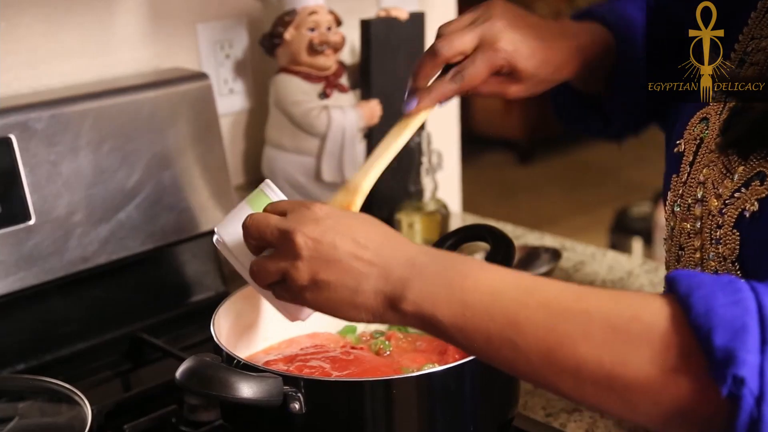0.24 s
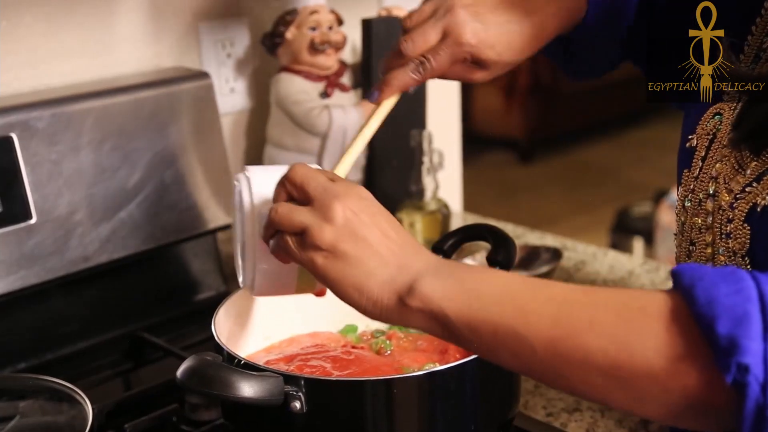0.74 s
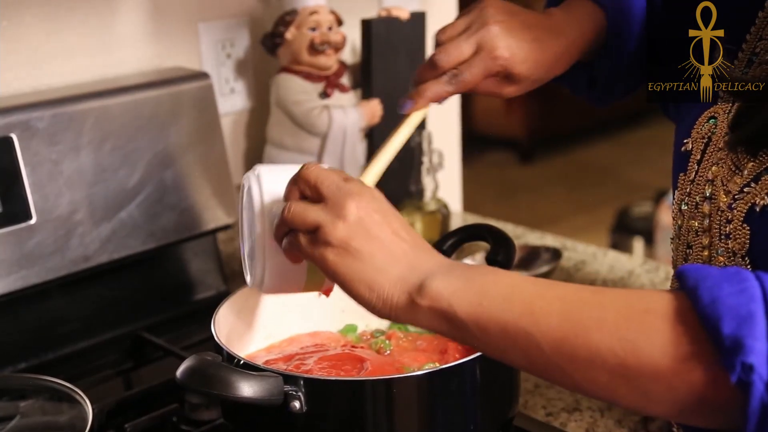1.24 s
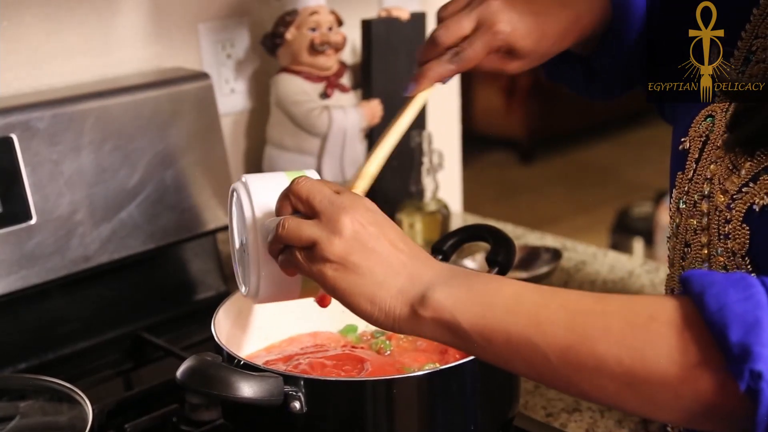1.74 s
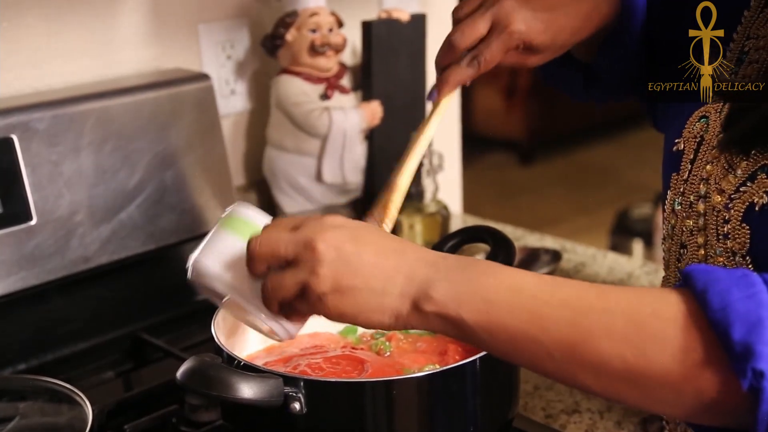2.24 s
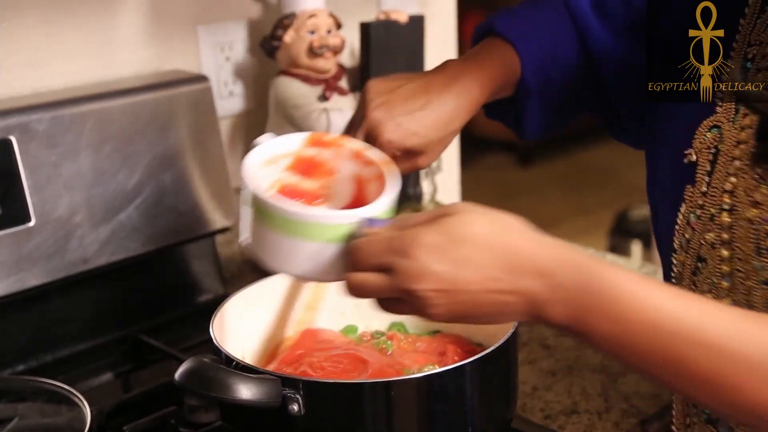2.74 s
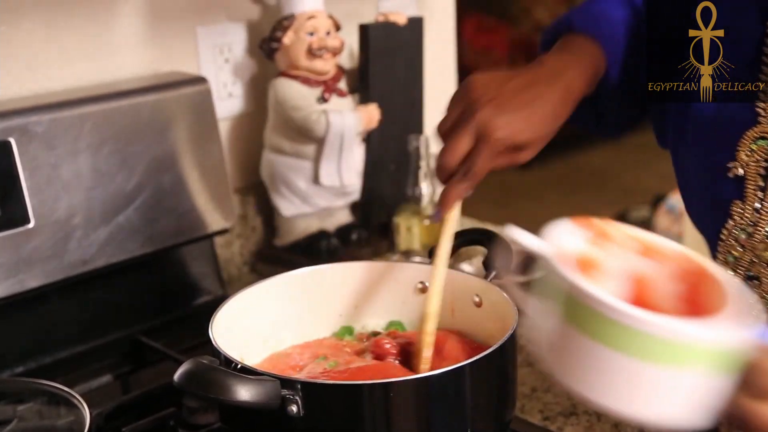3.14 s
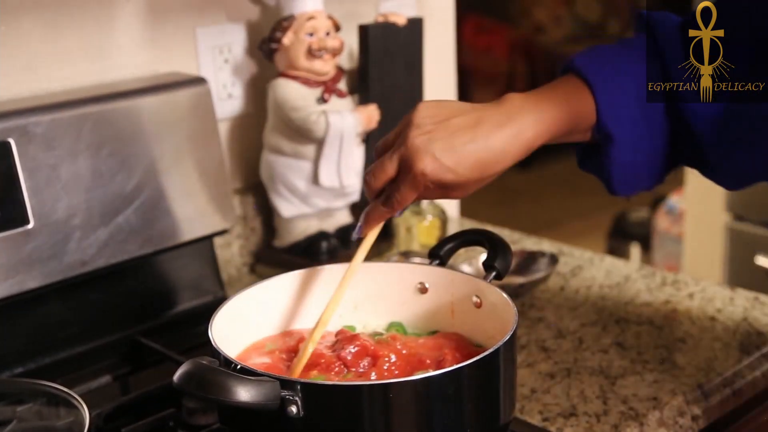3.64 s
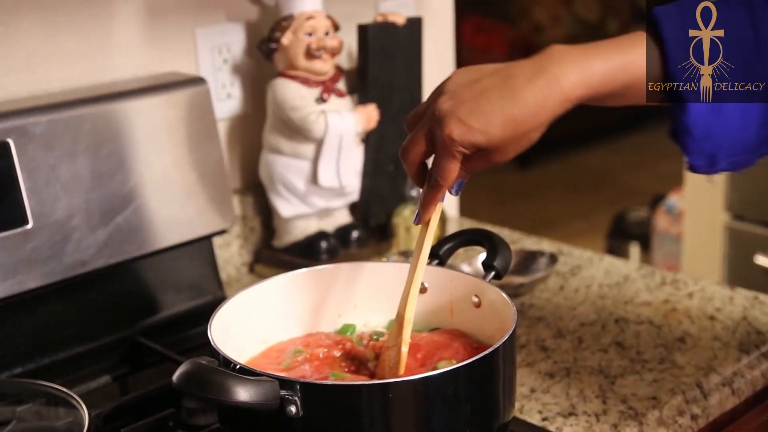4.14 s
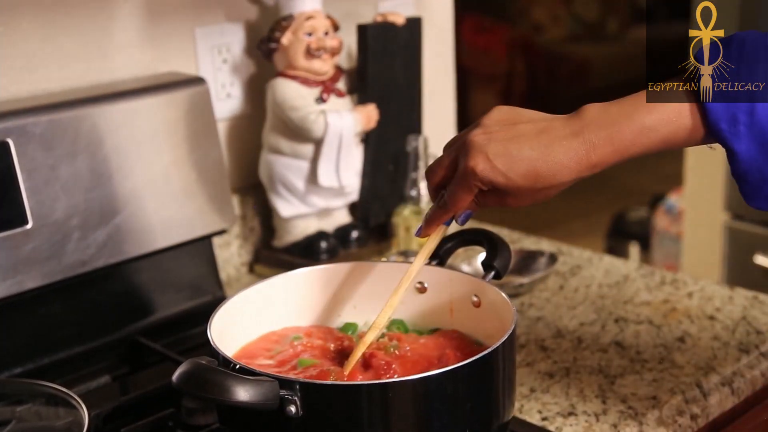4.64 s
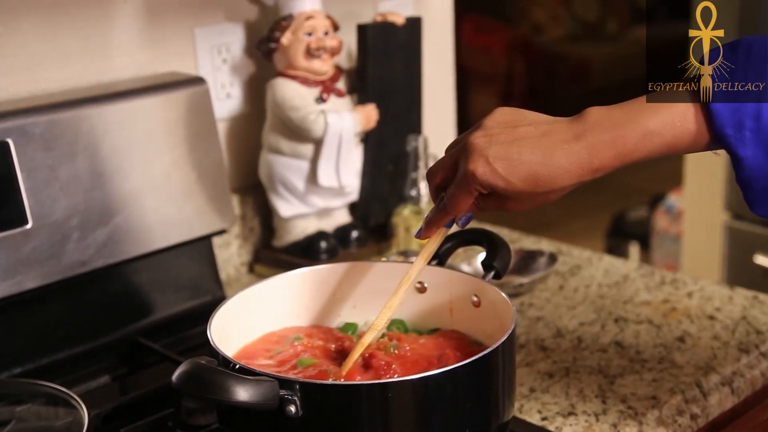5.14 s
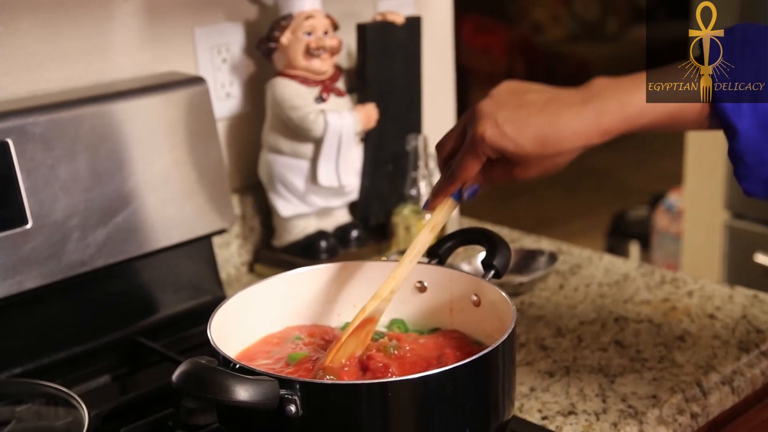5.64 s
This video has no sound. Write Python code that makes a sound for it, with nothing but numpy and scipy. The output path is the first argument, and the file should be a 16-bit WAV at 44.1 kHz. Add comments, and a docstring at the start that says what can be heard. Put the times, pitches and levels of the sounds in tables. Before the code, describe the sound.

In a small kitchen, closely miked, hot oil crackles finely while a wooden spoon clacks and taps a hand-held plastic tub, with three loud hollow tocks. The tub is lifted away with a dull bump, the frying sinks under sauce, soft thuds and squelches follow, then the spoon hits the bare enamel pot wall, which rings, with scraping and a quick second cluster of knocks.

```python
"""Dry wooden clacks and a fine crackle of hot oil come first, then short hollow tocks: a wooden spoon knocks
tomato sauce out of a plastic tub into a hot enamel pot, then stirs it. Tub, shaft and pot are struck bodies,
built from decaying modes and contact noise; the pot thuds under the sauce and rings when its bare wall is hit.
Oil is random pops over fizz until the sauce covers it; sauce and scrapes are shaped noise and stick-slip.
A small kitchen adds echoes and a decaying tail; a close microphone has gain control."""
import sys
import numpy as np
from scipy import signal
from scipy.fft import rfft, irfft
from scipy.io import wavfile

SR = 44100
rng = np.random.default_rng(int(sys.argv[2]) if len(sys.argv) > 2 else 0)


def wav_out(sig):
    """Save sig, one row per channel (or a flat mono array), as 16-bit PCM at SR to the path in sys.argv[1]."""
    wavfile.write(sys.argv[1], SR, np.round(np.clip(np.atleast_2d(sig).T, -1, 1) * 32767).astype(np.int16))


N = 260315
TIME = np.arange(N) / SR   # s, through the scene
AGE = np.arange(SR * 3 // 5) / SR   # s, since a single blow or burst

# Spoon on the hand-held tub: t/s, level/dB, wall f/Hz, swell time/s, base level/dB, rim level/dB
TUB_TAPS = [(0.062, -14.5, 1920, 0.00074, -1, -16), (0.3279, -19.5, 1750, 0.00078, -24, -3.5),
            (0.33, -19, 2260, 0.0012, -2.5, -15), (0.4082, -16, 2277, 0.0017, 8.5, -8),
            (0.6550, -21.5, 1600, 0.0006, -3, -30), (1.0965, -4.5, 1845, 0.0013, -23, -9),
            (1.1006, -14, 2150, 0.0015, -19, -23), (1.2, 5.5, 1792, 0.0012, -33, -14),
            (1.5283, 1.5, 1776, 0.0011, -11, -9), (1.847, -40.5, 1780, 0.0018, 3, 1),
            (2.0556, -7.5, 1805, 0.0014, -6, -14), (2.831, -32, 1510, 0.001, -0.5, -13)]
# Modes of the tub's base, then of its rim: f/Hz, level/dB, t60/s
TUB_BASE = [(517.5, -17.5, 0.019), (800, -11.5, 0.0095), (914, -12, 0.022), (1043, -8, 0.031),
            (1400, -5, 0.0041)]
TUB_RIM = [(2280, -10.5, .018), (3096, -1, 0.0055), (3655, -8, 0.0046), (3950, -18, 0.018),
           (5930, -14.5, .008), (6876, -19, 0.003)]
# Dry clacks of the spoon's shaft: t/s, level/dB, lowest f/Hz that the contact excites
CLACKS = [(0.0005, -20, 1500), (0.0056, -19.5, 1400), (0.042, -29.5, 1790), (0.0640, -21, 710),
          (1.0981, -21.5, 2500), (2.6286, -14, 240), (2.8285, -34, 600), (4.998, -22, 2000),
          (5.0167, -18, 2000), (5.304, -40, 2216)]
# Modes of the wooden shaft: f/Hz, level/dB, t60/s
SHAFT_MODES = [(347.5, -18, 0.029), (520, -20.5, 0.021), (725, -17.5, 0.076), (1408, -4, 0.014),
               (1606, -3.5, 0.015), (1780, -13, 0.033), (2113, -7.5, 0.043), (2457, -15, 0.11),
               (2796, -9.5, 0.028), (3998, -7.5, 0.018), (4500, -21.5, 0.019), (5110, -10.5, 0.013),
               (6345, -21.5, 0.011), (7930, -45.5, .012)]
# Soft knocks on the pot's bottom through the sauce: t/s, level/dB
THUDS = [(0.4120, -34), (3.1542, -26.5), (3.6225, -26.5), (3.6370, -29.5), (4.0655, -29.5)]
# Damped modes of the pot's bottom: f/Hz, level/dB, t60/s
BOTTOM_MODES = [(248, -16, 0.027), (362, -8.5, 0.033), (493, -10.5, 0.061), (538, -7, 0.046),
                (689, -2.5, 0.042), (1010, -11, 0.0154), (1115, -10.5, 0.025), (1465, -13, 0.064),
                (1750, -29, 0.018)]
# Soft noise bursts, decaying tails of early tub taps, then sauce sucking at the spoon:
# t/s, level/dB, centre f/Hz, t60/s
SOFT_BURSTS = [(0.333, -36.5, 1800, 0.23), (0.359, -42, 350, 0.07), (0.4130, -28, 1400, 0.073),
               (2.742, -42, 1400, 0.3), (2.9230, -44.5, 1290, 0.15), (3.6980, -43, 4260, 0.048),
               (3.877, -44.5, 320, 0.041)]
# Spoon on the bare pot wall: t/s, level/dB, ring level/dB, overtone level/dB
POT_HITS = [(4.6145, -1.5, -1.5, -7.5), (4.6629, -16, 8.5, -10.5), (4.6825, -20, -2, -15),
            (4.9344, -30.5, -14, -11), (4.9472, -37, -4, -6), (4.97, -26, 0, -18), (4.9808, -14, 0, -11),
            (4.9999, -11, 9.5, 2), (5.0170, -16.5, -4, 11.5)]
# Modes of the pot wall, low ones, overtones and short-lived knock: f/Hz, level/dB, t60/s
POT_RING = [(397, -35, 0.62), (1076, -26.5, 0.31), (1999, -4, 0.29), (2030, -22, 0.19), (2395, -22.5, 0.11),
            (2560, -34.5, .22)]
POT_OVERTONES = [(3020, -28, 0.073), (4060, -29.5, 0.34), (4547, -26.5, 0.16), (5280, -38.5, 0.3),
                 (7200, -46, 0.28), (8789, -34, 0.16), (8970, -47, 0.39), (11540, -57, .15),
                 (12760, -58, .2), (15000, -48, 0.13)]
POT_KNOCK = [(844, -23, 0.011), (1067, -9.5, 0.023), (1350, -2.5, 0.0078), (1600, -2, 0.014),
             (1830, -7, 0.014), (2490, -20.5, 0.0093)]
# Spectrum of the shudder of pot and stove grate: f/Hz, level/dB per Hz
SHUDDER = [(150, -39.5), (300, -14.5), (420, -13.5), (700, -4.5), (1080, -3.5), (1350, -12), (1750, -6),
           (2400, -4.5), (3100, -16), (5000, -23), (6500, -49), (15000, -56)]
# Spoon resting on the ringing wall: t/s, length/s, damping/(dB/s)
RESTS = [(4.715, 0.22, 105), (5.003, 0.12, 332)]
# Spoon scraping along the pot, pressed ever harder, then let go: t of greatest force/s, level/dB, swell/(dB/s)
SCRAPES = [(4.692, -24.5, 250), (4.885, -42.5, 88), (5.013, -26.5, 209)]
# Spits of oil at set times: t/s, peak level/dB
SPITS = [(0.36, -30), (0.985, -29), (1.3145, -31), (1.723, -26.5), (1.738, -29), (2.798, -28.5)]
# Spectrum of the fine frying fizz: f/Hz, level/dB per Hz
FIZZ = [(150, -8.5), (350, -2), (650, 1.5), (1100, -2.5), (1500, 6), (2200, -3), (3500, -6), (6000, -6),
        (8000, -14.5), (11000, -13.5), (16000, -30)]
# Echoes from nearby hard surfaces: delay/s, level/dB
ECHOES = [(.0092, 0.5), (.0195, -7.5), (.0292, -9), (.0480, -12)]
# Decay time of the kitchen: f/Hz, t60/s
KITCHEN_T60 = [(150, 0.28), (500, 0.67), (1500, 0.45), (2500, 0.16), (5000, .25), (14000, 0.1)]
# Spectrum of room tone: f/Hz, level/dB per Hz
AIR = [(15, -43.5), (25, -17), (114, -4), (363, -8), (476, -8), (734, -9), (1040, -8.5), (1230, -7.5),
       (2050, -9.5), (2280, -10), (2550, -10.5), (3520, -13.5), (5570, -16), (16000, -18)]
# Spectrum of a faint steady noise that widens the stereo image: f/Hz, level/dB per Hz
STEREO_WIDTH = [(25, -7.5), (120, 6.5), (500, 5.5), (1500, -3), (4000, 2.5), (16000, 4.5)]

# Stirred-in sauce smothers the frying, which picks up again as the sauce heats
SMOTHER_S, SMOTHER_DB_PER_S, SMOTHERED_DB = 3.2, 9.5, -16
REHEAT_S, REHEAT_DB_PER_S = 5.46, 21
# Stirring adds small squelches at random, from the moment the sauce is mixed in
STIR_LENGTH_S, STIR_SQUELCHES_PER_S, STIR_DB, STIR_T60_S = 1.0, 12, -50, 0.09
STIR_LOW_HZ, STIR_HIGH_HZ = 280, 1500
SCRAPE_RELEASE_DB_PER_S = 241.5
# Faint squeak of wet wood on enamel, growing until the spoon strikes the wall
SQUEAK_S, SQUEAK_HZ, SQUEAK_SAG_HZ_PER_S = 4.3, 1105, 390
SQUEAK_DB, SQUEAK_SWELL_DB_PER_S, SQUEAK_FADE_S = -68, 31.5, 0.02
# Frying: pop rate between flurries and lulls, then starting levels
POPS_PER_S, POP_DB, FIZZ_DB = 900, -58.5, -53.5
# Further spits come at random while the oil is bare, within SPIT_DB plus or minus SPIT_RANGE_DB
SPITS_PER_S, SPIT_DB, SPIT_RANGE_DB, SPIT_HZ = 5, -33.5, 6, 7500
BUMP_S = 2.849   # the tub is lifted away
CUTOFF_HZ = 15900   # upper limit of the microphone chain


def amp(db):
    """Logarithmic level: decibels to linear gain."""
    return 10 ** (np.asarray(db) / 20)


def rms_one(x):
    """Normalisation to unit root-mean-square."""
    return x / np.sqrt(np.mean(x ** 2) + 1e-20)


def at_hz(points, hz):
    """Linear interpolation of a table along log frequency."""
    f, value = np.transpose(points)
    return np.interp(np.log(np.maximum(hz, 1)), np.log(f), value)


def band(x, low_hz, high_hz):
    """Causal band-pass filtering."""
    edges = [low_hz, min(high_hz, SR * .48)]
    return signal.sosfilt(signal.butter(2, edges, "band", fs=SR, output="sos"), x)


def noise(spectrum, size):
    """Spectral shaping: white noise weighted by frequency, at unit rms."""
    gain = amp(at_hz(spectrum, np.fft.rfftfreq(size, 1 / SR)))
    return rms_one(irfft(rfft(rng.standard_normal(size)) * gain, size))


def fade(t60):
    """Exponential decay: a free vibration falls 60 dB in t60 seconds."""
    return np.exp(-np.log(1000) * AGE / t60)


def swelling(rise_s):
    """Critically damped envelope: unit peak at rise_s, then decay."""
    return AGE / rise_s * np.exp(1 - AGE / rise_s)


def struck(modes, vary_db=3.5):
    """Modal superposition: damped sines of alternating sign, weighted anew by each blow."""
    out = np.zeros(len(AGE))
    for k, (hz, db, t60) in enumerate(modes):
        gain = (-1) ** k * amp(db + vary_db * rng.normal())
        out += gain * fade(t60) * np.sin(2 * np.pi * hz * AGE)
    return out


def crack(low_hz, high_hz, t60):
    """Contact noise: a brief broadband burst as two surfaces meet."""
    return band(rng.standard_normal(len(AGE)) * fade(t60), low_hz, high_hz)


def add(track, s, sound):
    """Linear superposition of a sound at time s."""
    start = max(round(s * SR), 0)
    track[start:start + len(sound)] += sound[:N - start]


def tub(crack_db=-11, rattle_db=-25, rattle_t60=0.25, rattle_width=1.35):
    """Heavily damped resonance: the wall swells and dies fast, its pitch set by where the spoon lands."""
    out = np.zeros(N)
    for s, db, hz, swell, base_db, rim_db in TUB_TAPS:
        wall = swelling(swell) * np.sin(2 * np.pi * hz * AGE)
        rim = struck(TUB_RIM, vary_db=2.5)
        rim += amp(crack_db) * crack(low_hz=2500, high_hz=7960, t60=.012)
        rattle = amp(rattle_db) * crack(hz / rattle_width, hz * rattle_width, rattle_t60)
        base = amp(base_db) * struck(TUB_BASE)
        add(out, s, amp(db) * (wall + base + amp(rim_db) * rim + rattle))
    return band(out, low_hz=129.1, high_hz=14800)   # the tocks carry little sound below about 130 Hz


def shaft(crack_db=-7):
    """Modal excitation: hard wood clacks with many short modes above the contact's lowest frequency."""
    out = np.zeros(N)
    for s, db, low_hz in CLACKS:
        clack = struck(SHAFT_MODES, vary_db=2.5)
        clack += amp(crack_db) * crack(low_hz=1101, high_hz=5960, t60=0.05)
        add(out, s, amp(db) * band(clack, low_hz, high_hz=13800))
    return out


def bottom(squelch_db=-3):
    """Viscous damping: sauce shortens the bottom's modes and squelches round the spoon."""
    out = np.zeros(N)
    for s, db in THUDS:
        thud = struck(BOTTOM_MODES, vary_db=0.5)
        squelch = crack(low_hz=300, high_hz=1400, t60=0.24)
        add(out, s, amp(db) * (thud + amp(squelch_db) * squelch))
    return out


def soft_bursts(width=1.41):
    """Decaying band noise: tails of early tub taps, then thick sauce letting go of the spoon in wet bursts."""
    count = round(STIR_SQUELCHES_PER_S * STIR_LENGTH_S)
    stirred = []
    for when, pitch in rng.random((count, 2)):
        hz = STIR_LOW_HZ * (STIR_HIGH_HZ / STIR_LOW_HZ) ** pitch
        stirred.append((SMOTHER_S + STIR_LENGTH_S * when, STIR_DB, hz, STIR_T60_S))
    out = np.zeros(N)
    for s, db, hz, t60 in list(SOFT_BURSTS) + stirred:
        burst = rms_one(band(rng.standard_normal(len(AGE)), hz / width, hz * width))
        add(out, s, amp(db) * burst * fade(t60))
    return out


def pot(shudder_db=-22, shudder_t60=0.28, crack_db=-30):
    """Impact and coupled vibration: each wooden knock shakes the pot on its grate."""
    out = np.zeros(N)
    for s, db, *_ in POT_HITS:
        knock = struck(POT_KNOCK) + amp(crack_db) * crack(low_hz=2500, high_hz=9000, t60=.006)
        shudder = amp(shudder_db) * noise(SHUDDER, len(AGE)) * fade(shudder_t60)
        add(out, s, amp(db) * (knock + shudder))
    return band(out, low_hz=373, high_hz=15000)


def wall_ring(modes, strength_db, damping):
    """Energy balance: each blow tops up the modes' energy; damping in dB/s drains it."""
    blows, contact = np.zeros(N), np.hanning(SR // 700)
    for (s, *_), db in zip(POT_HITS, strength_db):
        # wood stays in contact for over a millisecond
        add(blows, s, amp(db) ** 2 * contact ** 2 / np.sum(contact ** 2))
    drained = amp(-np.cumsum(damping) / SR)
    out = np.zeros(N)
    for hz, db, t60 in modes:
        kept_per_sample = amp(-60 / (t60 * SR)) ** 2
        # dividing first lets a new blow escape the earlier draining
        energy = signal.lfilter([1], [1, -kept_per_sample], blows / drained ** 2 + 1e-30)
        out += amp(db) * np.sqrt(energy) * drained * np.sin(2 * np.pi * hz * TIME)
    return out


def pot_ring():
    """Selective damping: of the bell-like tone, the resting spoon damps only the low modes."""
    _, level_db, ring_db, overtone_db = np.transpose(POT_HITS)
    damping = sum(db_per_s * ((TIME > s) & (TIME < s + length)) for s, length, db_per_s in RESTS)
    low_modes = wall_ring(POT_RING, level_db + ring_db, damping)
    return low_modes + wall_ring(POT_OVERTONES, level_db + overtone_db, np.zeros(N))


def scrape_force():
    """Contact force: once the spoon has met the wall, each scrape swells to its peak and lets go."""
    strokes = []
    for s, db, swell in SCRAPES:
        below_peak_db = np.maximum(swell * (s - TIME), SCRAPE_RELEASE_DB_PER_S * (TIME - s))
        strokes.append(amp(db - below_peak_db))
    return np.max(strokes, axis=0) * (TIME > POT_HITS[0][0])


def drag(slips_per_s=220, shudder_db=-16, spread_db=2.5):
    """Stick-slip friction: the spoon catches on the enamel, each slip a tiny knock."""
    sizes = amp(spread_db * rng.uniform(-1.7, 2, N)) * rng.choice([-1, 1], N)
    slips = (rng.random(N) < slips_per_s / SR) * sizes
    slip = struck(POT_KNOCK) + amp(shudder_db) * noise(SHUDDER, len(AGE)) * fade(0.15)
    rubbing = band(signal.fftconvolve(slips, slip)[:N], low_hz=380, high_hz=1880)
    return scrape_force() * rms_one(rubbing)


def squeak(waver=0.01265):
    """Periodic stick-slip: regular slipping whistles, sinking as the spoon slows; waver is rms fraction."""
    length = POT_HITS[0][0] - SQUEAK_S
    age = np.clip(TIME - SQUEAK_S, 0, length)
    gate = np.minimum(np.minimum(age, length - age) / SQUEAK_FADE_S, 1)
    wander = rms_one(band(rng.standard_normal(N), low_hz=9.2, high_hz=90.4))
    hz = (SQUEAK_HZ - SQUEAK_SAG_HZ_PER_S * age) * (1 + waver * wander)
    level = amp(SQUEAK_DB + SQUEAK_SWELL_DB_PER_S * age)
    return gate * level * np.sin(2 * np.pi * np.cumsum(hz) / SR)


def frying_vigour():
    """Source level in dB: steady in the bare oil, sinking under the sauce, then recovering."""
    smothered = np.clip(-SMOTHER_DB_PER_S * (TIME - SMOTHER_S), SMOTHERED_DB, 0)
    return smothered + REHEAT_DB_PER_S * np.maximum(TIME - REHEAT_S, 0)


def frying(spread_db=5.2, clump_range_db=7, clumps_per_s=70):
    """Random impulse process: droplets burst in the oil in flurries of short pops, over a fine fizz."""
    vigour_db = frying_vigour()
    clumps_db = clump_range_db * rng.uniform(-1, 1, N)
    flurry = amp(np.interp(TIME * clumps_per_s, np.arange(N), clumps_db))
    sizes = amp(spread_db * np.minimum(rng.exponential(1, N), 3.6)) * rng.choice([-1, 1], N)
    pops = (rng.random(N) < POPS_PER_S * flurry / SR) * sizes * np.sqrt(flurry)
    pitches = np.geomspace(3600, 11500, 10)   # Hz
    dealt = rng.integers(0, len(pitches), N)   # each pop gets one pitch
    crackle = np.zeros(N)
    for k, hz in enumerate(pitches):
        crackle += band(pops * (dealt == k) + 1e-18, hz / 1.4, hz * 1.5)
    return amp(POP_DB + vigour_db) * rms_one(crackle), amp(FIZZ_DB + vigour_db) * noise(FIZZ, N)


def spits(t60=0.005, width=2.1, spread_octaves=0.38):
    """Transient radiation: drops of oil burst with a sharp tick of band noise."""
    count = round(SPITS_PER_S * SMOTHER_S)
    further = [(SMOTHER_S * when, SPIT_DB + SPIT_RANGE_DB * (2 * size - 1))
               for when, size in rng.random((count, 2))]
    out = np.zeros(N)
    for s, db in list(SPITS) + further:
        hz = SPIT_HZ * 2 ** (spread_octaves * rng.uniform(-1, 1))
        tick = band(rng.standard_normal(len(AGE)) * (fade(t60) + 1e-18), hz / width, hz * width)
        add(out, s, amp(db) * tick / np.abs(tick).max())
    return out


def bump(db=-46, hz=75, swell=0.0043):
    """Low-frequency transient: a dull bump as the tub is lifted away."""
    out = np.zeros(N)
    body = np.sin(2 * np.pi * hz * AGE) + 6 * crack(low_hz=81, high_hz=320, t60=.2)
    add(out, BUMP_S, amp(db) * swelling(swell) * body)
    return out


def kitchen(x, early_db=-6, early_t60=.13, gap=0.0064):
    """Reverberation: stove back and counter echo, and the room dies away band by band after a gap in s."""
    edges = np.geomspace(100, 16000, 9)   # Hz
    tail = np.zeros(len(AGE))
    for low, high in zip(edges, edges[1:]):
        decay = fade(at_hz(KITCHEN_T60, np.sqrt(low * high))) + amp(early_db) * fade(early_t60)
        tail += band(rng.standard_normal(len(AGE)), low, high) * decay
    tail *= AGE > gap
    tail /= np.sqrt(np.sum(tail ** 2))
    for delay, db in ECHOES:
        tail[round(delay * SR)] += amp(db)
    return signal.fftconvolve(x, tail)[:N]


def air(db=-56, width_db=-62):
    """Stationary noise: common room tone, plus a faint noise that widens the stereo image."""
    room_tone = amp(db) * noise(AIR, N)
    widening = amp(width_db) * noise(STEREO_WIDTH, N)
    return room_tone + widening * np.array([[1], [-1]])


def scene():
    """Direct and reverberant sound: the tub is close and dry; the pot's knocks excite the room more."""
    tocks, clacks = tub(), shaft()
    thuds = bottom() + soft_bursts()
    knocks = pot() + drag() + squeak()
    ring = band(pot_ring(), low_hz=302, high_hz=15400)
    crackle, fizz = frying()
    crackle = crackle + spits()
    to_room = amp(-20.0) * tocks + amp(-11.0) * clacks + amp(-14.5) * thuds
    to_room += amp(-15.0) * knocks + amp(-16.5) * ring + amp(-9) * crackle
    direct = tocks + clacks + thuds + knocks + ring + crackle + fizz + bump()
    return direct + kitchen(to_room) + air()


def record(dry, threshold_db=-7, slope=0.4, release_db_per_s=11, attack=0.002):
    """Dynamic compression: loud blows overload briefly and pull the gain down; it creeps back."""
    level_db = 20 * np.log10(np.abs(dry).max(axis=0) + 1e-9)
    over = slope * np.maximum(level_db - threshold_db, 0)
    ramp = release_db_per_s * TIME
    held_db = np.maximum.accumulate(over + ramp) - ramp   # peaks, released at a constant rate
    r = np.exp(-1 / (attack * SR))
    cut_db = signal.lfilter([1 - r], [1, -r], held_db)
    clipped = np.clip(dry * amp(-cut_db), -1, 1)
    return signal.sosfilt(signal.ellip(10, .1, 70, CUTOFF_HZ, fs=SR, output="sos"), clipped)


dry = scene()
out = record(dry)
wav_out(out)
```